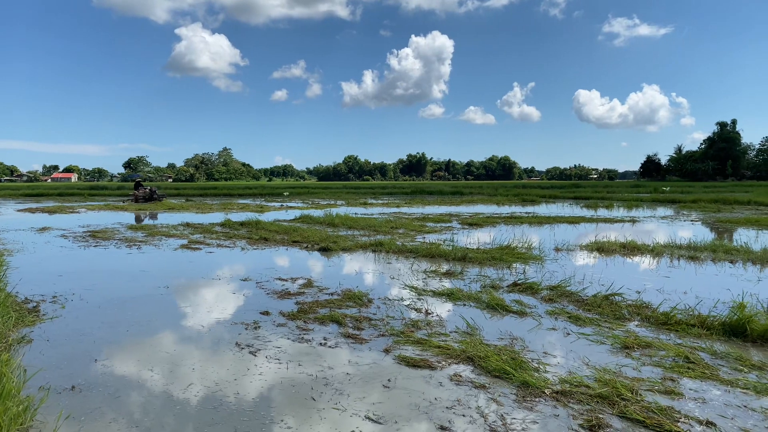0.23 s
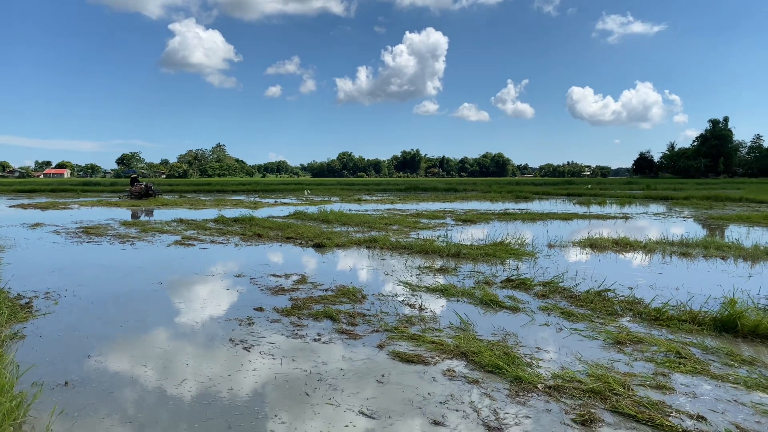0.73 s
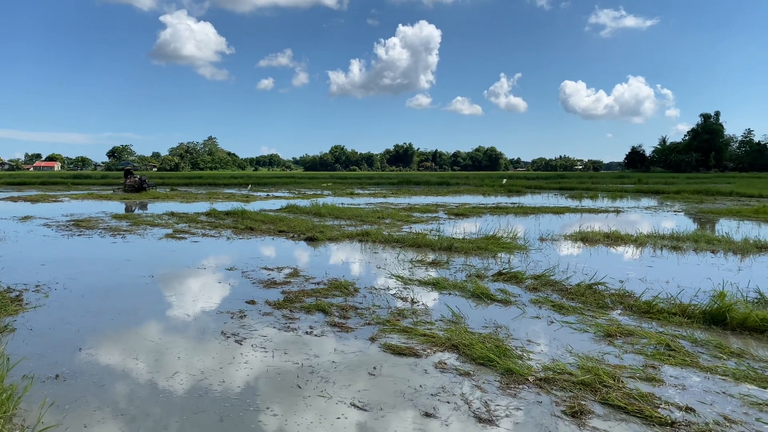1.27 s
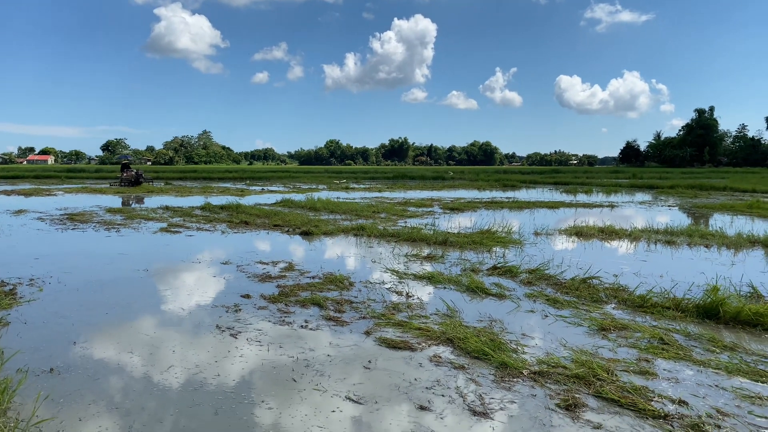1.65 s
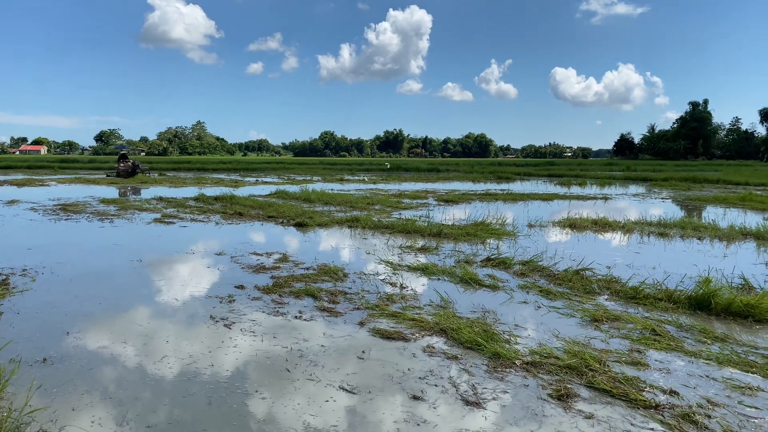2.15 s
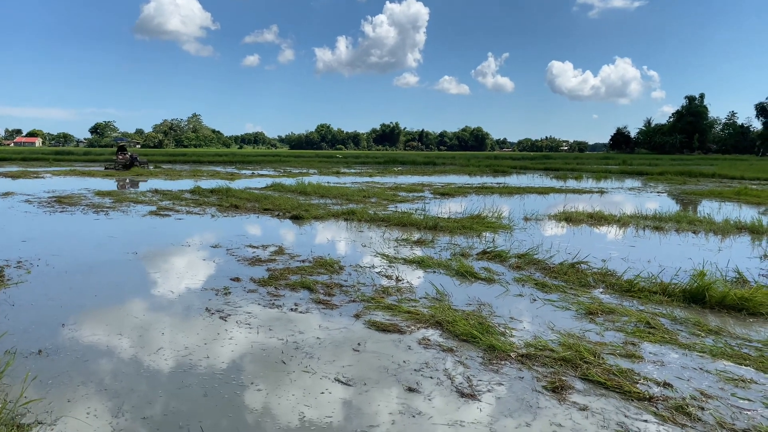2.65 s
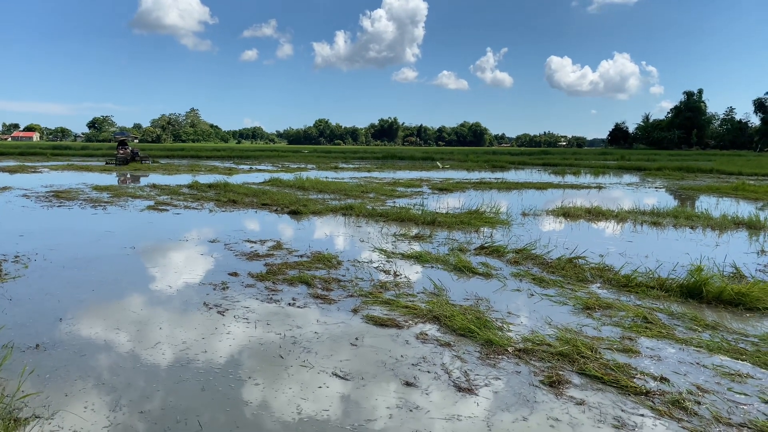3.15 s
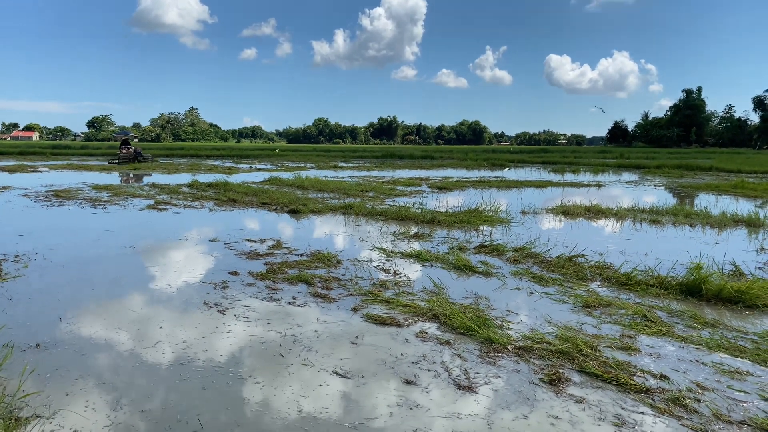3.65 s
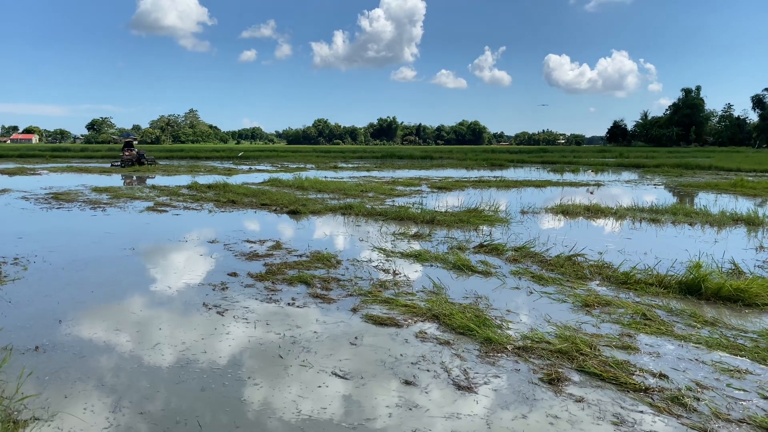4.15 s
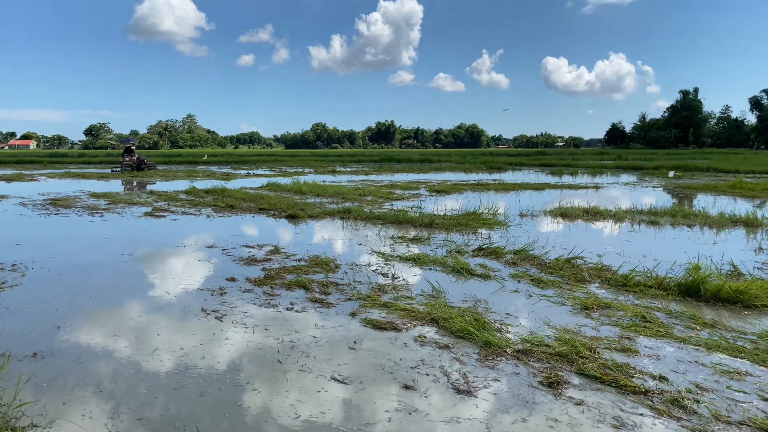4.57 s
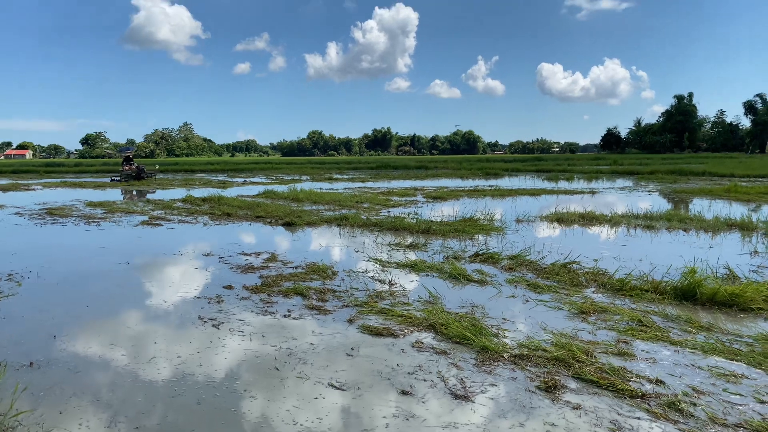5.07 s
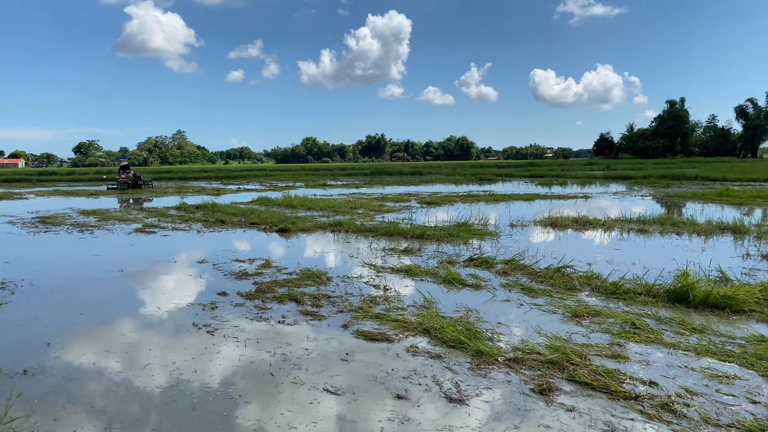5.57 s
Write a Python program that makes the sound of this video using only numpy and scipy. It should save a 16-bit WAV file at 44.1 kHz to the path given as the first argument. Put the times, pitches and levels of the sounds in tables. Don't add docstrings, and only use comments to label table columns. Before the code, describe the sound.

A single-cylinder diesel hand tractor chugs steadily across a flooded field, with soft wind buffets and small finger ticks close to the microphone.

```python
import sys
import numpy as np
from scipy import signal
from scipy.fft import rfft, irfft, next_fast_len
from scipy.io import wavfile
from scipy.ndimage import uniform_filter1d, map_coordinates

SR = 44100
rng = np.random.default_rng(int(sys.argv[2]) if len(sys.argv) > 2 else 0)


def field_ratio(decibels):
    return 10 ** (np.asarray(decibels, dtype=float) / 20)


def generate_wav(signal):
    frames = np.transpose(np.atleast_2d(signal))
    scaled = np.clip(frames, -1, 1) * 32767
    pcm = np.round(scaled).astype(np.int16)
    wavfile.write(sys.argv[1], SR, pcm)


N = 256662

# t/s, level/dB
CHURN = [(0, -2), (2.5, -0.5), (3.2, 1.5), (3.7, -2.5), (4.3, 0.5), (5.0, -1), (5.82, -2.5)]
# f/Hz, level per Hz/dB
HISS = [(6000, -120), (7400, -3), (8300, 0), (9500, -2), (10700, 0), (11900, -4), (12800, -5), (13600, -10),
        (15000, -8), (15700, -12), (15900, -45), (16300, -50)]
# t/s, level/dB
SPRAY = [(0, -77), (.4, -76), (.85, -44), (1.3, -68), (1.6, -70), (1.9, -68), (2.6, -69), (3.1, -48),
         (3.6, -71), (3.9, -43), (4.6, -50.5), (4.9, -73), (5.82, -82)]
# f/Hz, level per Hz/dB
DROPLETS = [(9600, -120), (10200, -6), (10800, -19), (11600, -5), (12600, 5), (13400, -24), (14500, -120)]
# t of the peak/s, peak level/dB, rise/s, fall/s
GUSTS = [(0.022, -49, 0.091, 0.18), (.44, -34, 0.094, 0.077), (0.89, -23.5, 0.047, 0.031),
         (1.14, -32.5, 0.26, 0.055), (1.44, -26.5, 0.24, 0.56), (2.71, -27, 0.18, 0.06),
         (2.9, -24.5, 0.026, 0.094), (3.08, -30, 0.24, .2), (3.24, -31, 0.26, 0.011),
         (3.39, -32.5, 0.059, 0.07), (3.55, -27.5, 0.076, 0.091), (3.86, -28.5, 0.055, .2),
         (4.36, -47, 0.27, 0.13), (4.53, -22.5, 0.073, 0.016), (4.651, -43, 0.045, 0.043),
         (4.94, -38.5, 0.2, 0.063), (5.12, -31, 0.031, 0.15), (5.272, -28.5, .08, 0.08),
         (5.43, -30, 0.15, 0.077), (5.79, -25.5, 0.29, 0.0078)]
# f/Hz, level per Hz/dB
BUFFET = [(18, -120), (25, -56), (45, -22), (70, 4.5), (110, -7.5), (200, -3.5), (350, -23), (600, -120)]
# t/s, peak level/dB, f/Hz, time to fade by 60 dB/s, snap level/dB
TICKS = [(2.4937, -16.5, 600, 0.022, -59.5), (2.4930, -16.5, 7100, 0.0036, -28),
         (2.4931, -9, 2720, 0.0033, -22.5), (2.5025, -28, 6500, .008, -59), (2.5225, -43, 6540, .008, -60),
         (2.856, -17, 303, 0.053, -53), (2.857, -27, 547, 0.089, -43), (0.033, -22.5, 2580, 0.024, -54),
         (.2255, -18.5, 2710, 0.0074, -34.5), (1.189, -20.5, 2360, 0.011, -41),
         (2.866, -4, 135, 0.036, -69), (4.08, -30.5, 568, 0.15, -60), (4.103, -25.5, 488, 0.056, -59.5),
         (4.125, -32, 940, 0.045, -56), (4.577, -21, 600, 0.022, -60), (4.657, -15.5, 590, 0.021, -31),
         (4.657, -28.5, 6500, 0.0081, -60), (2.888, -26, 5850, .005, -31), (.161, -22, 2490, 0.0079, -38),
         (2.485, -34, 6600, .012, -60), (4.683, -19.5, 650, 0.016, -48), (4.719, -25, 616, 0.019, -60)]

# t/s, firings so far
CRANK = [(-.0321, 0), (.4849, 8), (.9998, 16), (1.5087, 24), (2.0128, 32), (2.5135, 40), (3.0132, 48),
         (3.5095, 56), (4.0054, 64), (4.5041, 72), (5.0025, 80), (5.5016, 88), (5.9373, 95)]
# t/s, load/dB
LOAD = [(0, 0), (.8, 0.5), (1.8, -0.5), (2.05, 0.5), (2.4, -0.5), (2.6, 0), (3.0, -3.5), (3.24, -0.2),
        (3.7, -2), (4.0, -0.5), (4.3, -0.5), (4.45, -1), (4.62, -0.5), (5.6, 1), (5.72, -2.5), (5.82, 1.7)]
# t/s, aspect 0-3
HEADING = [(0, 0), (1.2, 1.13), (1.7, 0), (2.4, 1.4), (3.5, 1.22), (3.9, 1.34), (4.7, 1.66), (5.82, 3)]
# f/Hz, width/Hz, level/dB, sign, times the gas passes it
MUFFLER = [(104.3, 47, 0, 1, 2), (125, 119, -8.9, -1, 1), (250, 123, -13, 1, 1), (55, 19, -16.1, 1, 1)]
# t/s, level/dB
TAIL_PIPE = [(0, -3), (.3, -5), (.6, -6), (.9, -3), (1.2, 2), (2.5, 3), (4, 5), (5.82, 3.5)]
# delay after firing/s, level/dB
RETURN_WAVE = (.0193, -15)
# f/Hz, width/Hz, depth 0-1
MIRROR = [
    (160, 4.3, 0.46),
    (184.6, 3.7, 0.95),
]
MIRROR_S = (0.82, 3)
# f/Hz, level per Hz/dB
LOW_KNOCK = [(250, -120), (400, 4), (800, 8), (1000, -6), (1400, -30), (2500, -120)]
# t/s, level/dB
COMBUSTION = [(0, -42), (.25, -35.5), (.4, -40.5), (.55, -40), (1.05, -40.5), (1.5, -43.5), (2.5, -42.5),
              (2.78, -43), (3.04, -43), (3.55, -43.5), (3.8, -52.5), (4.3, -50.5), (4.55, -44), (4.85, -46),
              (5.2, -42), (5.57, -38.5), (5.82, -47)]
# t/s, level/dB
CRISP = [(0, 0.5), (1.2, 1.5), (3.4, 4), (4.8, -3), (5.2, -16), (5.82, -15)]
HEAD_HZ = (4200, 4800, 5500)
# t/s, level/dB
HEAD_SEEN = [(0, -62.5), (4.7, -56.5), (5.0, -51.5), (5.3, -53.5), (5.82, -52)]
# t/s, level/dB
RATTLE = [(0, -41), (.2, -42.5), (.5, -42.5), (2.0, -43), (3.0, -41), (5.06, -43.5), (5.82, -38.5)]
# f/Hz, level per Hz/dB
ASPECTS = [
    [(1050, -4), (1400, 0.5), (1650, 4), (2100, 2.5), (2400, 5), (2800, 6), (3400, -1), (3800, 0),
     (4200, -17), (4750, -8), (5500, -7), (6000, -8.5), (6500, -7.5), (7400, -8)],
    [(1050, 3), (1400, 6.5), (1650, 2), (2100, -0.5), (2400, -4.5), (2800, -3.5), (3400, -1.5),
     (3800, -3.5), (4200, -7), (4750, -1), (5500, -8), (6000, -7), (6500, -2.5), (7400, -7)],
    [(1050, 2.5), (1400, 2.5), (1650, 2), (2100, -1), (2400, 1.5), (2800, 3), (3400, -5.5), (3800, -0.5),
     (4200, -11.5), (4750, -6.5), (5500, -5), (6000, -9.5), (6500, -6), (7400, -7.5)],
    [(1050, 11), (1400, -9), (1650, -5), (2100, -1), (2400, 3), (2800, -5.5), (3400, -8), (3800, -3.5),
     (4200, -12), (4750, -3.5), (5500, -15), (6000, -17), (6500, -11.5), (7400, -13)],
]
# f/Hz, level per Hz/dB
CASING = [(150, 2), (200, 0), (260, 5.5), (323, -4), (385, -7.5), (450, -8), (540, -9), (680, -1.5),
          (802, 1), (1010, -12), (1200, -13), (1560, -25.5), (2640, -120)]
# f/Hz, width/Hz, level/dB
PANEL = [(925, 71, 2.5), (747, 45, -4.5), (2370, 140, -1.5)]
# t/s, level/dB
PANEL_SEEN = [(0, -59), (4.6, -57), (5.15, -54), (5.4, -43.5), (5.82, -54)]
# multiple of the firing rate, level against the casing at start/dB, at end/dB
GEARS = [(28, -10, -7), (29, -25, -11), (31, -9, -18), (50, -22, -13), (51, -13, -11), (19, -12, -12)]

# t/s, depth/dB, hold/s, release/s
BASS_GUARD = [
    (-.1, 6.5, 0.21, 0.23),
    (3.245, 12, 0.069, 0.21),
    (4.652, 11.5, 0.34, 0.19),
]
# t/s, depth/dB, hold/s, release/s
MID_GUARD = [
    (-.1, 2.7, .3, .15),
    (.25, 3.9, 0.27, .2),
    (3.23, 5, 0.015, 0.082),
    (4.64, 7.9, .6, .3),
]
# f/Hz, lead of the right/radians
LEAD = [(300, .27), (400, -.3), (1100, -2), (1220, -.5), (1650, -3.1), (2000, -7), (2400, -9.3),
        (2700, -7.5), (3350, -9.4), (4000, -11.6), (4700, -12.1), (7300, -12.4), (8300, -9.42),
        (15800, 3.14)]
# f/Hz, level/dB
SHADE = [(20, .8), (80, 0), (160, -1.2), (250, -1), (400, 2.5), (950, 2.5), (1120, -8), (1300, 0),
         (1650, 1), (1900, -6), (2550, -9), (2950, -3), (3280, -11), (3700, -5), (4500, -3), (5800, 0)]
# f/Hz, likeness 0-1
ALIKE = [(30, .93), (70, .99), (150, .999), (500, .85), (900, .96), (2000, .9), (4000, .9), (5000, .91),
         (8000, .92), (12000, .97)]
# t/s, stretch of the port pattern
TURN = [(0, 0.97), (.6, 1.02), (2, 1.015), (4, 1.045), (4.4, 1.094), (5.0, 1.105), (5.5, 1.14),
        (5.82, 1.15)]
# f/Hz, shift/radians
ROUND = [(2000, 0), (2400, -1.3), (2700, -5.4), (3050, -6.4), (3220, -4.6), (3550, -5.6),
         (4000, -2 * np.pi)]
# t/s, share 0-1
BENT = [(1.0, 0.94), (1.6, 0.0043), (3.8, 0.14), (4.2, 1)]
# f/Hz, level/dB
SPARED = [(4700, 12), (5600, 8), (7500, 7), (8300, 14), (9300, 7), (12000, 6), (15000, 6)]
SHARP_S = [.225, .29, .355, 1.0, 1.38, 1.76, 1.82, 1.945, 2.07, 2.135, 2.49, 2.888, 5.125, 5.31, 5.56]
# start/s, end/s, f above which/Hz
TOP_LOST = [(2.33, 2.4, 14200), (2.62, 2.76, 13500), (3.02, 3.3, 13600), (3.45, 3.53, 13400),
            (4.22, 4.29, 13300), (4.56, 4.62, 13800)]


def unit(x):
    return x / np.sqrt(np.mean(x ** 2) + 1e-20)


def along(points, hz):
    f, v = np.transpose(points)
    return np.interp(np.log(hz + 1), np.log(f + 1), v)


def curve(rows):
    s, value = np.transpose(rows)
    return np.interp(np.arange(N) / SR, s, value)


def wobble(rate):
    return map_coordinates(rng.standard_normal(int(N * rate / SR) + 4), [np.arange(N) * rate / SR])


def filtered(x, response):
    m = next_fast_len(N + SR // 2)
    return irfft(rfft(x, m) * response(np.fft.rfftfreq(m, 1 / SR)), m)[..., :N]


def noise(spectrum, gate):
    return unit(filtered(gate * rng.standard_normal(N), lambda hz: field_ratio(along(spectrum, hz))))


def mode(f, hz, width):
    return 1j * f * width / (hz * hz - f * f + 1j * f * width)


def late(f, s):
    return np.exp(-2j * np.pi * f * s)


def clicks(cycles):
    return np.diff(np.floor(cycles), prepend=0)


def luck(cycles, spread_db):
    return spread_db * rng.standard_normal(100)[cycles.astype(int)]


def patchy(x, depth_db):
    z = signal.stft(x, nperseg=512)[2]
    gain = uniform_filter1d(rng.standard_normal(z.shape), size=5, axis=0)
    gain = uniform_filter1d(gain, size=9, axis=1)
    return unit(signal.istft(z * field_ratio(depth_db * unit(gain)), nperseg=512)[1][:N])


def field():
    firings = curve(CRANK)
    shake = 1 + 0.1 * np.cos(2 * np.pi * (firings - .15)) + 0.19 * np.cos(4 * np.pi * (firings + 0.13))
    churn = field_ratio(-49 + curve(CHURN) + 0.69 * wobble(40)) * patchy(noise(HISS, 1), depth_db=2.0)
    spray = field_ratio(curve(SPRAY) + 1.0 * wobble(25)) * patchy(noise(DROPLETS, 1), depth_db=15.0)
    return shake * (churn + spray)


def wind():
    t = np.arange(N) / SR
    puffs = [db - 10 * np.where(t < s, (s - t) / rise, (t - s) / fall) for s, db, rise, fall in GUSTS]
    level_db = np.max(puffs, 0).clip(-60) + 0.72 * wobble(8.1)
    air = noise(BUFFET, 1)
    steady = air / np.sqrt(.1 + abs(uniform_filter1d(air ** 2, size=1800)))
    return field_ratio(level_db) * unit(filtered(steady, lambda hz: 1 / (1 + (hz / 130) ** 4)))


def grip():
    out, t = np.zeros(N + SR), np.arange(SR // 10) / SR
    for s, db, hz, t60, snap_db in TICKS:
        ring = field_ratio(db - 60 * t / t60) * np.sin(2 * np.pi * hz * t) * (1 - np.exp(-t * hz * 3))
        snap = field_ratio(snap_db - 60 * t / 0.0018) * rng.standard_normal(len(t))
        out[round(s * SR):][:len(t)] += ring + snap
    return out[:N]


def guard(rows, grab_s, lag_s=0):
    t = np.arange(N) / SR
    return sum(np.interp(t, np.cumsum([s, grab_s, hold + lag_s, release]), [0, -db, -db, 0])
               for s, db, hold, release in rows)


def over_water(x):
    early, later = [filtered(x, lambda f: 1 - depth * mode(f, hz, width)) for hz, width, depth in MIRROR]
    share = np.interp(np.arange(N) / SR, MIRROR_S, [0, 1])
    return (1 - share) * early + share * later


def exhaust(firings, strength):
    kicks = clicks(firings) * strength * SR / 16
    return_s, return_db = RETURN_WAVE

    def muffler(f):
        chambers = sum(sign * field_ratio(db) * mode(f, hz, w) ** passes for hz, w, db, sign, passes in MUFFLER)
        return chambers * (late(f, .0003) - field_ratio(return_db) * late(f, return_s))

    thump = filtered(kicks, muffler)
    thump += filtered(kicks, lambda f: field_ratio(-24) * mode(f, 296, 90) * late(f, .0165))
    drone_db = curve(TAIL_PIPE) + 1.5 * wobble(7)
    drone = field_ratio(drone_db) * np.cos(2 * np.pi * 9 * (firings + .017) + .25 * wobble(7))
    return unit(thump + drone)


def guarded_exhaust(firings):
    strength = field_ratio(luck(firings, 1.0))
    pipe = field_ratio(-25.5 + curve(LOAD)) * unit(over_water(exhaust(firings, strength)))
    upper = filtered(pipe, lambda hz: 1 - 1 / (1 + (hz / 172) ** 8))
    grab_s, upper_lag_s = 0.032, 0.28
    upper_db = guard(BASS_GUARD, grab_s, upper_lag_s) + luck(firings + .1, 1.15)
    return field_ratio(guard(BASS_GUARD, grab_s)) * (pipe - upper) + field_ratio(upper_db) * upper


def metal(gate, body_db, crack=0):
    heading = curve(HEADING)
    source = gate * rng.standard_normal(N) + crack

    def edge(hz):
        body = field_ratio(body_db) + (1 - field_ratio(body_db)) / (1 + (4100 / (hz + 1)) ** 8)
        return body / (1 + (950 / (hz + 1)) ** 12) / (1 + (hz / 7600) ** 16)

    sides = [filtered(source, lambda hz: field_ratio(along(side, hz)) * edge(hz)) for side in ASPECTS]
    return unit(sum(np.clip(1 - abs(heading - k), 0, 1) * side for k, side in enumerate(sides)))


def blow(since, peak_s, spread_s):
    return np.exp(-.5 * ((since - peak_s) / spread_s) ** 2)


def stroke(since, size, depth, fall_s):
    return 1 + depth * size * since / fall_s * np.exp(1 - since / fall_s)


def knocks(lead, since, size, casing_db):
    knock_db = curve(COMBUSTION)
    burst = size * (blow(since, 0.0049, 0.0017) + 0.3 * blow(since, 0.015, 0.0022))
    low = field_ratio(casing_db - 12.5) * noise(LOW_KNOCK, burst)
    crack = 8 * size * clicks(lead - .075)
    knock = metal(burst, body_db=-4.5, crack=crack)
    top = filtered(knock, lambda hz: 1 - 1 / (1 + (hz / 5400) ** 12))
    tilt_db = luck(lead, 0.35)
    bright = field_ratio(knock_db - 5.0) * (field_ratio(-tilt_db) * (knock - top) + field_ratio(curve(CRISP) + tilt_db) * top)
    hiss = field_ratio(knock_db - 19.5 + 0.83 * wobble(14)) * noise(HISS, size * blow(since, .0048, 0.0016))
    return low + bright + hiss


def bark(lead, size, casing_db):
    level_db = casing_db - 14.5 + 2 * curve(HEADING)
    response = lambda hz: mode(hz, 820, 330) ** 2 * late(hz, 0.00221)
    return field_ratio(level_db) * unit(filtered(clicks(lead) * np.sqrt(size), response))


def head_ping(lead, since):
    strength = field_ratio(1.4 * rng.standard_normal((len(HEAD_HZ), 100))[:, lead.astype(int)])
    struck = strength * blow(since, 0.005, 0.0027) * rng.standard_normal(N)
    ping = sum(filtered(hit, lambda hz: mode(hz, c, 1100) ** 2) for hit, c in zip(struck, HEAD_HZ))
    return field_ratio(curve(HEAD_SEEN)) * unit(ping)


def rattle(firings, since, size):
    valves = 1 + 0.074 * np.cos(2 * np.pi * (firings - .1)) + 0.088 * np.cos(4 * np.pi * (firings + 0.11))
    level_db = curve(RATTLE) + 1 + 0.89 * wobble(40)
    return field_ratio(level_db) * metal(stroke(since, size, 0.14, 0.0075) * valves, body_db=0.5)


def casing(firings, lead, since, size, casing_db):
    gate = stroke(since, size, 0.059, 0.003) * (1 + 0.11 * np.cos(2 * np.pi * (firings - .15)))
    hum = field_ratio(casing_db + 1.4 + 0.77 * wobble(34)) * noise(CASING, gate)
    t = np.arange(SR // 10) / SR
    ring = rng.standard_normal(len(t)) * np.exp(-t / 0.013)
    answer = signal.fftconvolve(clicks(lead) * size, ring)[:N]
    colour = lambda hz: field_ratio(along(CASING, hz)) * late(hz, 0.00498) / (1 + (380 / (hz + 1)) ** 8)
    return hum + field_ratio(casing_db - 7) * unit(filtered(answer, colour))


def side_panel(since, size):
    response = lambda hz: sum(field_ratio(db) * mode(hz, c, w) ** 2 for c, w, db in PANEL)
    shaken = stroke(since, size, 0.19, 0.0037) * rng.standard_normal(N)
    return field_ratio(curve(PANEL_SEEN)) * unit(filtered(shaken, response))


def gears(firings, casing_db):
    out = np.zeros(N)
    for order, first_db, last_db in GEARS:
        level_db = casing_db + np.linspace(first_db, last_db, N) + .9 * wobble(5)
        out += field_ratio(level_db) * np.sin(2 * np.pi * order * (firings - .42) + .25 * wobble(5))
    return out


def engine():
    firings = curve(CRANK)
    casing_db = -37.5 + 0.045 * curve(LOAD) + guard(MID_GUARD, grab_s=0.13)
    lead = firings + 0.0701
    since = lead % 1 / 16
    size = field_ratio(luck(lead, .8))
    out = guarded_exhaust(firings)
    out += knocks(lead, since, size, casing_db)
    out += bark(lead, size, casing_db)
    out += head_ping(lead, since)
    out += rattle(firings, since, size)
    out += casing(firings, lead, since, size, casing_db)
    out += side_panel(since, size)
    return out + gears(firings, casing_db)


def ports(x):
    hz, t, left = signal.stft(x, SR, nperseg=512)
    column = hz[:, None]
    stretch = np.interp(t, *np.transpose(TURN))
    moves = np.interp(column, [1200, 1600, 1850, 2200, 4000, 6000, 9000, 12000], [0, 1, 1, .7, .2, 0, 0, .2])
    opening_db = 40 * (stretch - 1.02).clip(0) * np.exp(-.5 * ((column - 2500) / 600) ** 2)
    seen = column / (1 + (stretch - 1) * moves)
    alike = np.clip(along(ALIKE, seen), 0, 1)
    bent = np.interp(t, *np.transpose(BENT)).clip(0, 1)
    detour = np.exp(1j * np.interp(seen, *np.transpose(ROUND)))
    shift = np.exp(1j * np.interp(seen, *np.transpose(LEAD))) * (1 - bent + bent * detour)
    scatter = np.exp(2j * np.pi * rng.random(left.shape))
    right = left * field_ratio(along(SHADE, seen) + opening_db) * (alike * shift + np.sqrt(1 - alike ** 2) * scatter)
    return signal.istft(np.array([left, right]), SR, nperseg=512)[1][:, :N]


def scene():
    return ports(engine() + field() + wind() + grip())


def thin_treble(x, faint_db):
    frames = dict(fs=SR, window="cosine", nperseg=2048, noverlap=1024)
    hz, t, z = signal.stft([x[0] + x[1], x[0] - x[1]], **frames)
    column = hz[:, None]
    band = np.arange(len(hz)).clip(0, len(hz) - 2) // 16
    power = np.add.reduceat(abs(z) ** 2, np.arange(0, len(hz) - 1, 16), axis=1)
    level = 10 * np.log10(power + 1e-20)
    level = level + 1.6 * rng.standard_normal(level.shape)
    sharp = abs(t[:, None] - SHARP_S).min(1) < .014
    strong = abs(z) ** 2 > 0.51 / 16 * 10 ** (level[:, band] / 10)
    z = z * (strong | (column < 6500) | sharp)
    keep = (level > level[::-1] - along(SPARED, hz[8::16])[:, None]) | sharp
    keep = keep & (level > level[0, 13:21].mean(0) - faint_db)
    near = uniform_filter1d(abs(z) ** 2, size=7, axis=1)
    drowned = (near[0] < near[1] * field_ratio(-2 * 12)) & ((column > 1400) & (column < 2800))
    for start, end, top_hz in TOP_LOST:
        drowned = drowned | ((column > top_hz) & (t > start) & (t < end))
    spill = 0.13 * z[1] * sharp * (column > 11000)
    z = z * np.array([~drowned, drowned | True]) + np.array([spill, 0 * spill])
    sharp_top = sharp & ((column > 11000) & (column < 15700))
    kept = z * (keep[:, band] | (column < 4400) | sharp_top)
    mid, side = signal.istft(kept, **frames)[1][:, :N]
    return np.array([mid + side, mid - side]) / 2


def band_limit(x):
    return signal.sosfilt(signal.butter(12, 16320, fs=SR, output="sos"), x)


def record(dry):
    cut = filtered(dry, lambda hz: (hz < 16300) / (1 + (44 / (hz + 1)) ** 4))
    mix = thin_treble(cut, faint_db=14.5)
    return band_limit(mix)


dry = scene()
out = record(dry)
generate_wav(out)
```